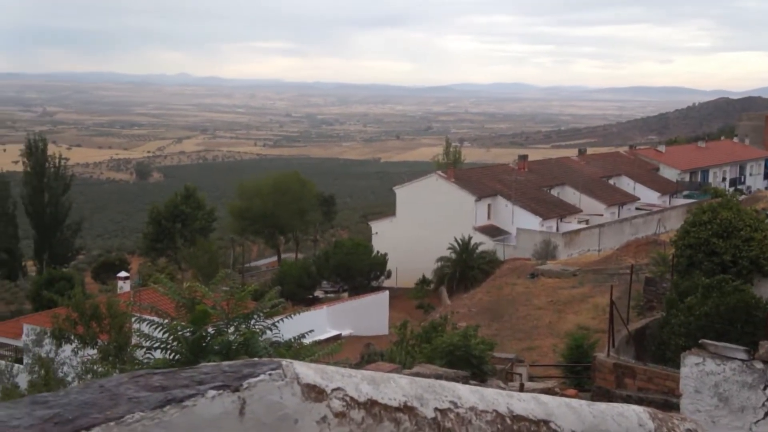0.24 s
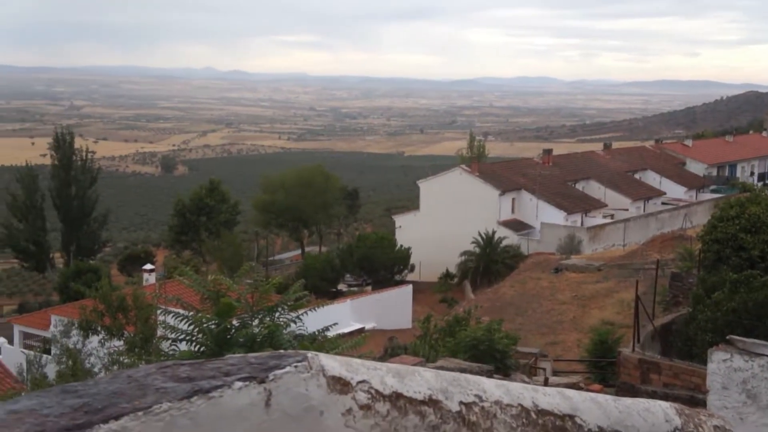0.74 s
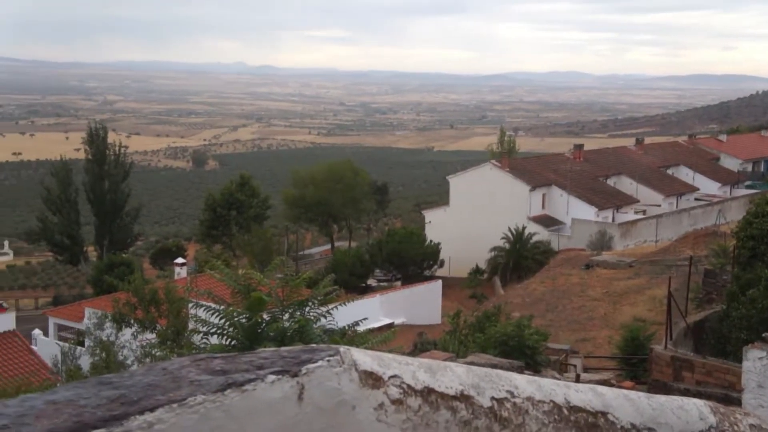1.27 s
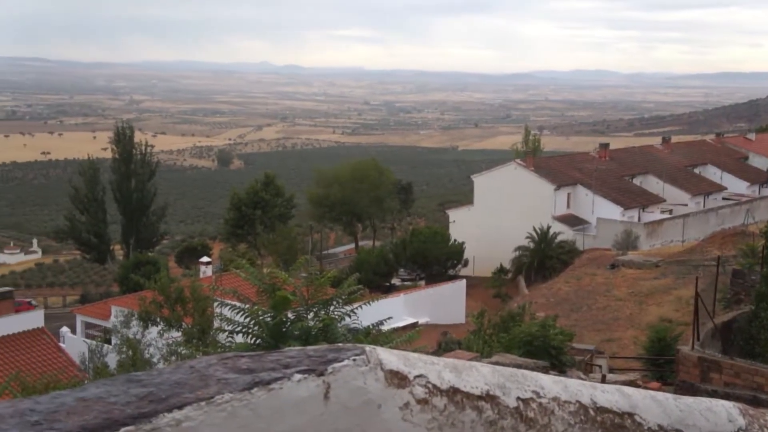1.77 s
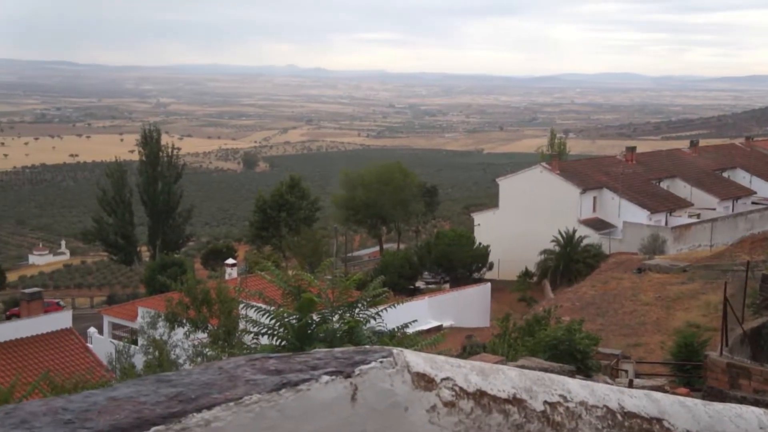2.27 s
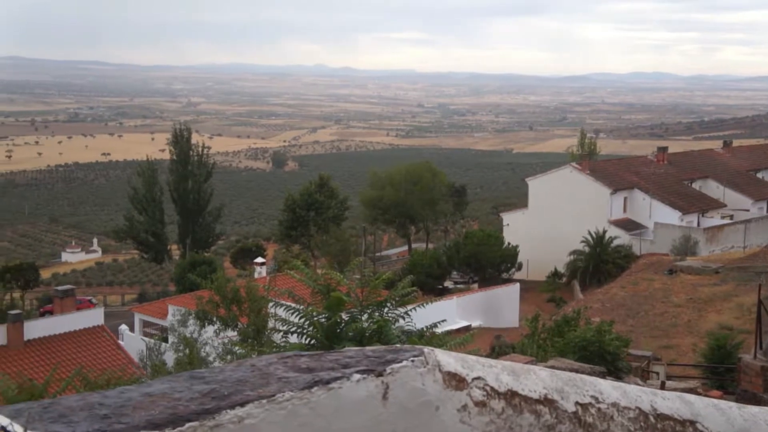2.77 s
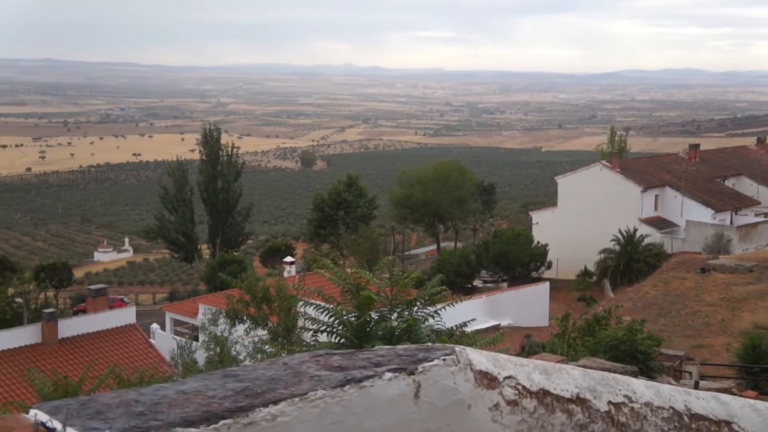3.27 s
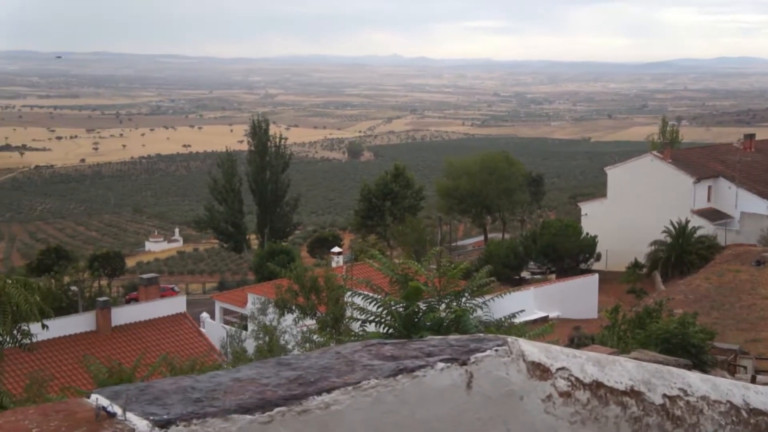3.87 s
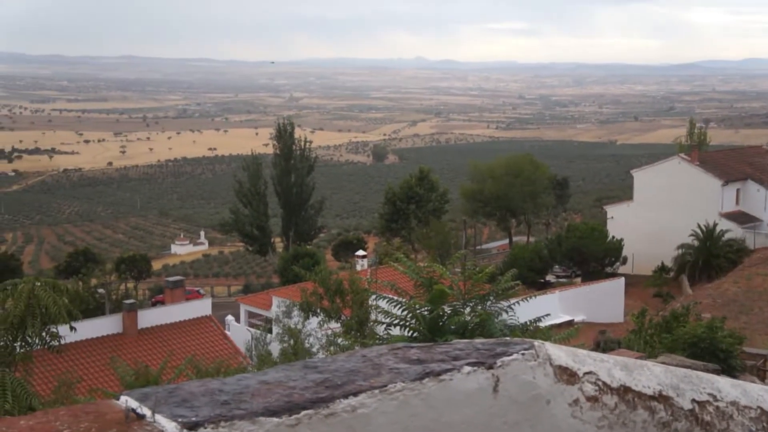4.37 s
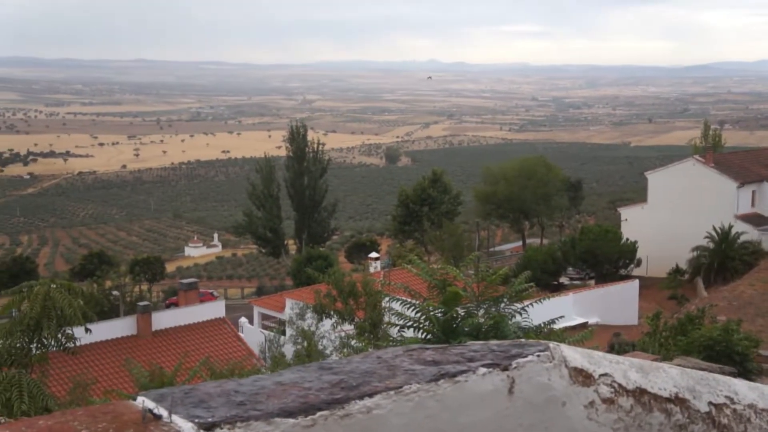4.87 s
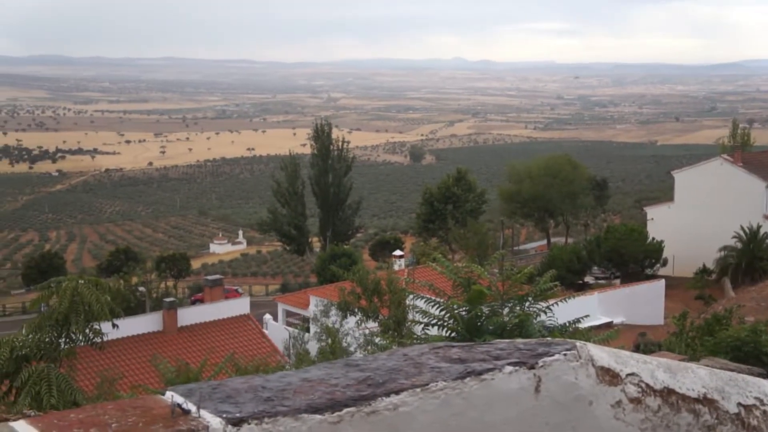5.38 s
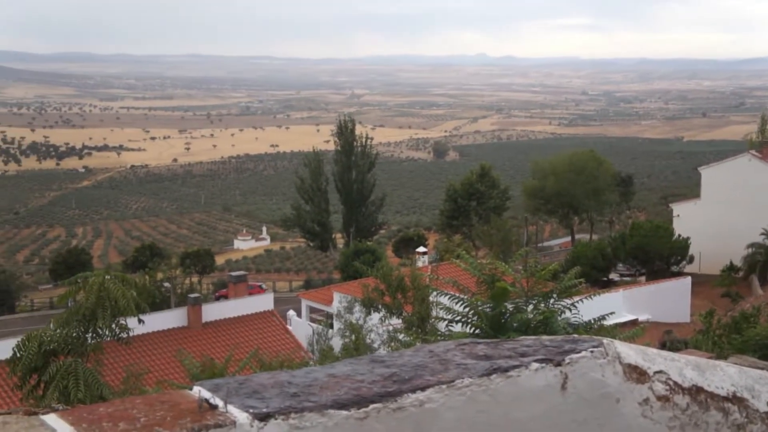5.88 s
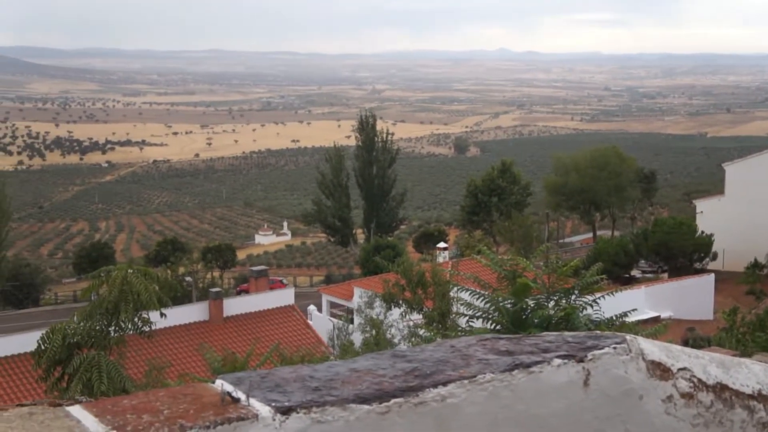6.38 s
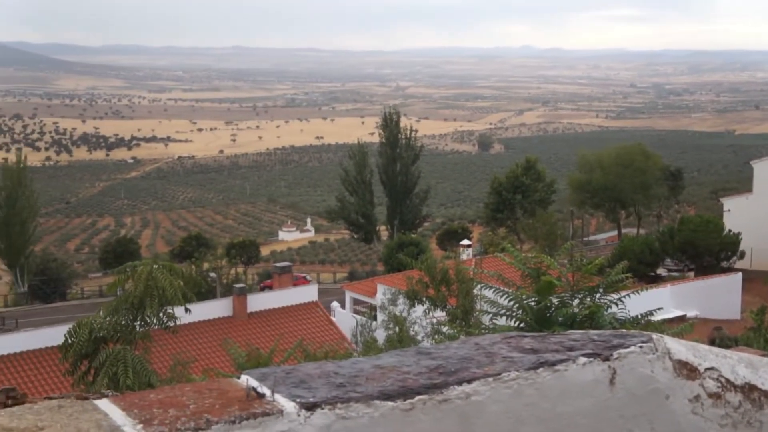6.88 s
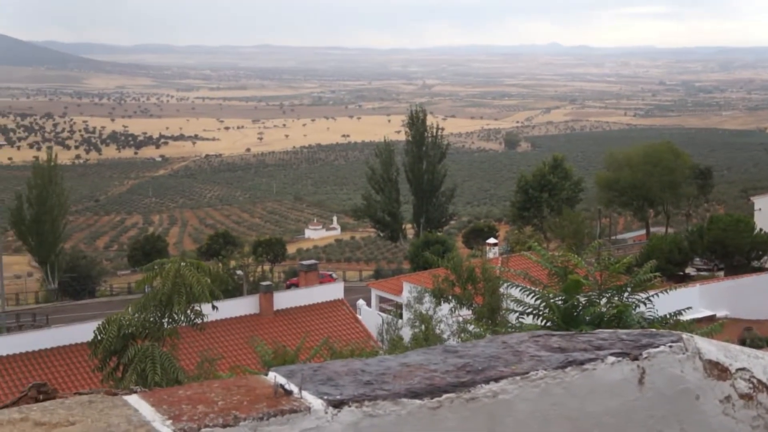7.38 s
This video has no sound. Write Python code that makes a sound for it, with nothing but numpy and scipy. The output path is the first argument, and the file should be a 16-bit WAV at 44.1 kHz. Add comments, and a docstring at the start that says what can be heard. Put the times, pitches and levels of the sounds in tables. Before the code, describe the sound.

Light rain falls steadily outdoors near houses, a soft wash with a fine patter on leaves. Single drops land close to the microphone as sharp, irregular ticks, the loudest near the end. Small birds give a few short, scratchy whistles that echo lightly between walls, clearest around the middle. A very faint low hum wavers underneath, all heard in stereo.

```python
"""Light rain on vine leaves by a house: a soft wash, a patter and a few sharp ticks close by.
Countless far drops blur into the wash; each nearer drop hits a leaf and makes it ring briefly.
Small birds fly past with short scratchy whistles that ring between the walls.
A faint hum wavers low down. A small microphone with two openings hears it all in stereo."""
import sys
import numpy as np
from scipy import signal
from scipy.fft import rfft, irfft
from scipy.io import wavfile
from scipy.ndimage import uniform_filter1d

SR = 44100
rng = np.random.default_rng(int(sys.argv[2]) if len(sys.argv) > 2 else 0)


def file_out(sig):
    """Save sig as 16-bit WAV at sys.argv[1]."""
    # one column per channel
    cols = np.atleast_2d(sig).T
    # limit, then scale
    lim = np.clip(cols, -1, 1)
    pcm = np.round(lim * 32767).astype(np.int16)
    wavfile.write(sys.argv[1], SR, pcm)


N = 336483


def rain():
    """Steady light rain: far drops make a wash, nearer ones patter on the leaves."""
    # strength of the rain over time: time_s, level_db
    strength = [(0.0, -45), (2.7, -44), (3.04, -45.5), (3.61, -44.5), (3.7, -45.5), (6.33, -44),
                (7.63, -44.5)]
    time_s, level_db = np.transpose(strength)
    level = gain_of(np.interp(np.arange(N) / SR, time_s, level_db))
    return level * (gain_of(3.5) * rain_wash() + gain_of(-4.5) * leaf_patter())


def rain_wash():
    """Countless far drops blur into a hiss with drifting patches and flicker."""
    # tone colour of the wash: pitch_hz, level_db
    colour = [(18, -51), (30, -22), (332, -7.5), (410, -5.5), (533, -5), (609, -5.5), (752, -6.5),
              (1210, -2.5), (3210, -10), (8760, -30.5), (10500, -31), (11700, -44.5), (13000, -42),
              (14900, -43), (16500, -65)]
    # how unevenly the wash falls: pitch_hz, swing_db
    unevenness = [(100, 1), (500, 2), (2000, 2.5), (4000, 1.5), (9000, 1.9)]
    frames, hz = N // 128 + 5, np.fft.rfftfreq(512, 1 / SR)
    left_real, left_imag, right_real, right_imag, drift = rng.standard_normal((frames, 257, 5)).T
    flicker = evened(uniform_filter1d(uniform_filter1d(drift[::-1], 60, 0), 2, 1))  # broad and quick
    patches = evened(uniform_filter1d(uniform_filter1d(drift, 6, 0), 20, 1))  # narrow and slower
    spectra = np.array([left_real + 1j * left_imag, right_real + 1j * right_imag])
    spectra *= gain_of(read(unevenness, hz)[:, None] * (patches + 0.8 * flicker))
    noise = signal.istft(spectra, nperseg=512, noverlap=384)[1][:, :N]
    return evened(equalize(noise, colour))


def leaf_patter(leaves=24, drops_per_s=400):
    """Each drop rings one leaf for a few cycles; a few drops are large."""
    # how loudly the leaves ring: pitch_hz, level_db
    leaf_levels = [(300, -11.5), (600, -4.5), (1200, 0), (2000, 6.5), (3100, 9), (5000, -23), (9000, -28)]
    size = gain_of(3.8 * np.minimum(rng.exponential(1, (2, N)), 3.5))
    hits = size * (rng.random((2, N)) < drops_per_s / SR)
    leaf_hit = rng.integers(0, leaves, (2, N))
    t, out = np.arange(1200) / SR, np.zeros((2, N))
    for leaf, hz in enumerate(np.geomspace(300, 9000, num=leaves)):
        ring = np.sin(2 * np.pi * hz * t) * t * np.exp(-t * hz / 0.99) * hz ** 1.01
        ringing = signal.oaconvolve(hits * (leaf_hit == leaf), ring[None])[:, :N]
        out += gain_of(read(leaf_levels, hz)) * ringing
    return evened(out)


def close_drops():
    """Single drops land close by: the loudest at set times, fainter ones at random."""
    # loudest drops: start_s, tick_db, tick_hz, leaf_db, leaf_hz, push_db, splash_db, pan_db
    # (leaf, push and splash levels count from the tick's level)
    loud_drops = [(0.06, -40, 1930, -10, 1050, -22, 5, 7), (0.27, -32.5, 2760, -4, 1520, -23, -24, -5),
                  (0.379, -45, 2210, 18, 1380, -5, -19, -4), (0.7664, -41, 2000, 8, 1020, -5, -20, 2),
                  (0.7869, -49, 2270, 20, 1200, -7, -5, 0.0), (0.822, -39, 1950, 7, 1040, -43, 10, 15.5),
                  (0.8405, -35, 1900, -8, 1060, -24, -20, -5), (1.1109, -38.5, 2760, -20, 1170, 7, -8, 0),
                  (1.283, -32.5, 2120, -15, 1020, -17, -14, -3),
                  (1.3358, -25.5, 2800, -32, 1500, -29, -2, 6.5), (1.6528, -40.5, 2740, 12, 1290, 1, -3, 0),
                  (2.2075, -26, 2700, -4, 1290, -15, -33, -3.5), (2.216, -44, 2880, 6, 1420, -10, -21, 3),
                  (2.3196, -25, 2930, -10, 1240, 3.5, -3, 17), (2.4453, -31.5, 2210, -10, 1230, 1, -5, -3),
                  (2.8016, -43.5, 1930, 8, 1010, -14, -18, 7), (3.1823, -38, 2910, 3, 1240, 2, -10, -2),
                  (3.4398, -50.5, 2900, 18, 1080, -9, -18, -5), (3.4969, -38, 2830, 5, 1230, -19, -24, -3),
                  (3.5623, -33.5, 1980, -0.5, 1060, -8, -17, -3), (4.37, -36.5, 2150, -1, 872, -17, -23, 3),
                  (4.412, -32.5, 2640, -3, 1310, -18, -26, -5), (4.5668, -31, 2800, -13, 1180, -20, -7, 9),
                  (4.784, -53, 2160, 14, 970, -10, -19, -1.0), (5.16, -42.5, 1960, 9.5, 1150, 0, -15, 3),
                  (5.5366, -34.5, 2230, -2, 775, -17, 2, 5), (5.7718, -45, 2180, 11, 1070, -15, -18, -1.5),
                  (5.826, -38, 2130, -2, 1010, 4, -19, 3), (5.925, -48, 2050, 5, 1000, 16, -12, 0),
                  (5.9623, -34, 3100, -17, 778, -25, -5, 0), (6.1644, -39, 3100, 0.5, 1110, -1, 1, 0),
                  (6.2933, -25.5, 2900, -34, 1000, -27, -33, -2),
                  (6.345, -37, 2280, -18, 1490, -16, -23, -9), (6.5355, -27, 2020, -0.5, 1240, -8, -27, -3),
                  (6.8079, -30.5, 3060, -5.5, 999, -3, -5, -1),
                  (7.0502, -14, 3200, -5.5, 1690, -15, -37, 9),
                  (7.1732, -49, 1930, 12.5, 1020, -11, -22, 10),
                  (7.223, -26, 2380, -11, 1200, -38, -16, -3), (7.231, -34.5, 2040, -15, 1250, -32, -24, 5),
                  (7.3105, -31, 3050, -2.5, 1380, -43, -15, 0), (7.3224, -43, 2240, 8, 1300, -15, 13, -1),
                  (7.432, -52, 3080, 24, 1540, -6, -1, -3)]
    # a typical faint drop, one row for each column above after start_s: middle, spread (same units)
    typical_drop = [(-46, 2.5), (2400, 400), (2, 5), (1150, 180), (-5, 5), (-15, 4), (0.0, 4)]
    middle, spread = np.transpose(typical_drop)
    draws = rng.random((24, 1 + len(middle)))  # 24 faint drops
    faint_drops = np.c_[draws[:, 0] * N / SR, middle + spread * np.sqrt(12) * (draws[:, 1:] - .5)]
    out = np.zeros((2, N))
    for start_s, *settings in loud_drops + faint_drops.tolist():
        add(out, start_s, drop(*settings))
    return out


def drop(tick_db, tick_hz, leaf_db, leaf_hz, push_db, splash_db, pan_db):
    """One impact makes a tick, the leaf's ring and tremble, a low push and a bright splash."""
    hard = tick_db + abs(pan_db) / 2 > -19  # the loudest hit something stiff: short, broad and bright
    tremble_s, spray_s = (.008, .0006) if hard else (.042, .001)
    tick_width_hz, splash_hz = (2400, 7900) if hard else (1600, 5400)
    t = np.arange(2200) / SR
    noise = rng.standard_normal(len(t)) * (1 - np.exp(-t / 0.0001))
    impact = 1.83 * np.exp(-(t / .00004 - 3) ** 2)
    burst = impact + noise * np.exp(-t / spray_s)
    tremble = noise * gain_of(-60 * t / tremble_s)
    tick = band(burst, tick_hz, tick_width_hz) + gain_of(-1.5) * band(tremble, tick_hz, 910)
    leaf = gain_of(leaf_db) * band(burst + gain_of(6) * tremble, leaf_hz, 600)
    push = gain_of(push_db) * band(np.gradient(burst), 315, 470)
    splash = gain_of(splash_db) * band(burst, splash_hz, 2100)
    return pan(gain_of(tick_db) * (tick + leaf + push + splash), pan_db)


def bird_calls():
    """Small birds whistle in short clusters of notes."""
    # notes: start_s, rise_s, hold_s, fall_s, level_db, start_hz, risen_hz, held_hz,
    # wobble_hz, high_tones_db, rasp_db, pan_db
    notes = [(0.945, 0.026, .016, 0.015, -12.5, 4450, 4960, 5240, 207, -21, -14.5, -2),
             (0.952, 0.004, .03, .014, -36, 2370, 2373, 2595, 179, -30, -8, -3),
             (0.978, 0.013, 0.064, 0.034, -21.5, 6300, 6370, 6694, 110, -20, -50, 2),
             (1.345, 0.0074, .003, 0.019, -32.5, 2370, 2426, 2480, 58, -3, -11, -7),
             (1.347, 0.0053, 0.0069, 0.0093, -30, 4500, 4890, 6050, 910, -25, -10, 0),
             (3.632, 0.011, 0.041, 0.012, -25, 4270, 4620, 4900, 180, -17.5, -12, -2),
             (3.637, 0.022, 0.011, 0.0062, -16, 2243, 3290, 3224, 49.3, -8.5, -16, -3.5),
             (3.692, 0.011, .006, .008, -23, 3210, 3240, 3320, 49, -10, -10, -3),
             (3.7, 0.01, 0.021, .014, -8.5, 4100, 4130, 4330, 88, -31, -15, -5),
             (3.733, 0.014, .02, 0.0055, -18.5, 2864, 3217, 3680, 342, -9.5, -9.5, -1),
             (3.77, 0.0076, 0.0029, .01, -3, 4360, 4190, 4080, 69, -37, -17, -3),
             (3.781, 0.00675, 0.0258, 0.025, -14.5, 4100, 4050, 4306, 69.4, -23, -23, -5.5),
             (4.913, 0.04, 0.0543, 0.023, -19, 6750, 7060, 6650, 152, -16, -54, -0.5),
             (4.924, 0.0059, .003, 0.047, -29, 5650, 5850, 5740, 400, -21, -14, -3),
             (5.287, 0.015, 0.016, 0.0098, -20, 5550, 5610, 5530, 188, -39, -20, -1.5),
             (5.297, 0.013, 0.035, 0.02, -24, 6640, 6910, 7040, 203, -15, -44, 1),
             (7.338, 0.027, 0.049, 0.01, -17.5, 6050, 6450, 6650, 102, -20.5, -49, -1.5),
             (7.432, 0.0088, 0.0085, 0.038, -14, 6400, 6500, 6320, 98, -19.5, -52, -1)]
    out = np.zeros((2, N))
    for start_s, *settings in notes:
        add(out, start_s, whistle(*settings))
    return out


def whistle(rise_s, hold_s, fall_s, level_db, start_hz, risen_hz, held_hz,
            wobble_hz, high_tones_db, rasp_db, pan_db):
    """A raspy note swells, holds and fades as its pitch slides and wobbles; fainter tones lie above."""
    corners_s = np.cumsum([0, rise_s, hold_s, fall_s])
    t = np.arange(0, corners_s[-1], 1 / SR)
    shake, hiss = rng.standard_normal((8000, 2))[:len(t)].T
    pitch = np.interp(t, corners_s[:3], [start_hz, risen_hz, held_hz])
    wobble = wobble_hz * evened(uniform_filter1d(uniform_filter1d(shake, 50), 50))
    phase = 2 * np.pi * np.cumsum(pitch + wobble) / SR
    octave = np.sin(2 * phase) * (pitch < SR / 7.3)
    mirror_hz, limit_hz = 20000, 15400  # a faint high artificial tone falls as the whistle rises
    mirrored = 0.23 * np.sin(2 * np.pi * mirror_hz * t - phase) * (mirror_hz - pitch < limit_hz)
    extra_tone = gain_of(-17) * np.sin(1.58 * phase)
    tone = np.sin(phase) + gain_of(high_tones_db) * (octave + mirrored + extra_tone)
    rasp = evened(resonate(resonate(hiss, 1.15 * pitch, 2600), 1.15 * pitch, 2200))
    level = gain_of(level_db + np.interp(t, corners_s, [-21.5, 0, 0, -36]))
    level *= signal.windows.tukey(len(t), .15)  # soft ends
    return pan(level * (np.sqrt(2) * tone + gain_of(rasp_db) * rasp), pan_db)


def wall_echoes(sound):
    """Sound bounces back: a quick tail from near walls, a faint long one from far houses."""
    # time the near walls' echo takes to fade by 60 dB: pitch_hz, fade_s
    near_walls = [(500, 0.064), (3200, 0.16), (4200, 0.21), (5000, 0.14), (6500, 0.2), (12000, 0.21)]
    # the same for the far houses: pitch_hz, fade_s
    far_houses = [(500, 2.3), (3300, 1.2), (4200, 1.4), (5000, 0.73), (6600, 0.75), (12000, .5)]
    echoes = np.zeros((2, SR))
    arrivals = np.arange(200, SR - 20, 20) + rng.integers(0, 20, (2, (SR - 201) // 20))
    np.put_along_axis(echoes, arrivals, rng.choice([-1., 1.], arrivals.shape), 1)
    hz, t, spectra = signal.stft(echoes, SR, nperseg=256)
    near_fade = gain_of(-60 * t / read(near_walls, hz)[:, None])
    far_fade = gain_of(-28 - 60 * t / read(far_houses, hz)[:, None])
    tail = signal.istft(spectra * (near_fade + far_fade), SR, nperseg=256)[1]
    return signal.fftconvolve(sound, tail / np.linalg.norm(tail[0]), axes=1)[:, :N]


def hum():
    """Faint low tones, mostly wavering and partly steady."""
    # tones of the hum: pitch_hz, width_hz, level_db, steady_share (0 to 1)
    tones = [(420, 25, -58, .1), (590, 30, -61, .0), (618, 20, -56, .3)]
    t, out = np.arange(N) / SR, 0
    for hz, width, db, steady in tones:
        noise = rng.standard_normal((2, N))
        wavering = evened(np.array([resonate(resonate(x, hz, width), hz, width) for x in noise]))
        tone = np.sqrt(2 * steady) * np.sin(2 * np.pi * hz * t)
        out = out + gain_of(db) * (tone + np.sqrt(1 - steady) * wavering)
    return out


def blend(main, other, likeness):
    """One microphone opening hears a share of the main sound, shifted in phase, plus some of the other."""
    # phase shift between the openings: pitch_hz, lag_radians
    lags = [(100, 1), (600, -0.53), (1120, -1.41), (1890, -2.5), (3100, -2), (4050, -2.5), (5500, -2.5),
            (8000, -2)]
    shift = np.exp(-1j * read(lags, np.fft.rfftfreq(N, 1 / SR)))
    return irfft(likeness * rfft(main) * shift + np.sqrt(1 - likeness ** 2) * rfft(other), N)


def gain_of(db):
    """Turns decibels into a factor."""
    return 10 ** (np.asarray(db) / 20)


def evened(x):
    """Scales a signal to an average power of 1."""
    return x / np.sqrt(np.mean(x ** 2) + 1e-20)


def read(points, hz):
    """Looks up a table's value at a pitch, gliding between its rows."""
    pitches, values = np.transpose(points)
    return np.interp(np.log(hz + 1), np.log(pitches + 1), values)


def equalize(x, points, amount=1):
    """Turns each pitch up or down by a table's decibels times the amount."""
    return irfft(rfft(x) * gain_of(amount * read(points, np.fft.rfftfreq(N, 1 / SR))), N)


def pan(sound, pan_db):
    """Makes a stereo pair with the left side louder by pan_db."""
    return sound * gain_of([[pan_db / 2], [-pan_db / 2]])


def add(mix, start_s, sound):
    """Mixes a sound in at its start time."""
    part = mix[..., max(round(start_s * SR), 0):][..., :sound.shape[-1]]
    part += sound[..., :part.shape[-1]]


def resonate(x, hz, width_hz):
    """Rings around one pitch: shifts that pitch down to zero, smooths, and shifts back."""
    turn = np.exp(2j * np.pi * np.cumsum(hz * np.ones(len(x))) / SR)
    decay = np.exp(-np.pi * width_hz / SR)
    return 2 * (turn * signal.lfilter([1 - decay], [1, -decay], x / turn + 1e-18)).real


def band(x, hz, width_hz):
    """Keeps the sound around one pitch and scales its peak to 1."""
    ring = resonate(resonate(x, hz, width_hz), hz, width_hz)
    return ring / abs(ring).max()


def scene():
    """Rain, close drops, birds and hum as the two microphone openings hear them."""
    # how alike rain and hum are on the two sides: pitch_hz, likeness (0 to 1)
    likeness = [(60, 0.25), (300, 0.24), (600, 0.1), (1000, 0.44), (3000, 0.95), (8000, 0.11),
                (15000, 0.13)]
    # how much louder they are on the left: pitch_hz, pan_db
    lean = [(60, -3.5), (180, 4), (550, 6), (1650, -1.5), (4970, 0.0), (15000, 2)]
    bed = rain() + hum()
    bed[1] = blend(bed[0], bed[1], read(likeness, np.fft.rfftfreq(N, 1 / SR)))
    bed = equalize(bed, lean, amount=np.array([[.5], [-.5]]))
    drops, birds = close_drops(), bird_calls()
    drops[1] = blend(drops[1], drops[0], likeness=0.97)
    birds[1] = blend(birds[1], birds[0], likeness=0.88)
    drops = gain_of(3) * (drops + gain_of(-38) * wall_echoes(drops))
    return bed + drops + gain_of(-2) * birds + gain_of(-3) * wall_echoes(birds)


def record(dry):
    """Filters cut the bass, a band near 12 kHz and the highest treble; loud calls turn the level down."""
    # a gap in the treble near 12 kHz, with a lift above it: pitch_hz, gain_db
    treble_gap = [(10600, -0.5), (11300, -9.5), (12500, -45), (13100, 4.5)]
    bass_hz, top_hz, loud_db, average_s = 60, 16200, -22.5, .12
    thin = signal.sosfilt(signal.butter(2, bass_hz, "high", fs=SR, output="sos"), dry)
    decay = np.exp(-1 / (average_s * SR))
    power_db = 10 * np.log10(signal.lfilter([1 - decay], [1, -decay], (thin ** 2).mean(0)) + 1e-12)
    turned_down = thin / gain_of(0.54 * np.maximum(power_db - loud_db, 0))
    top_cut = signal.firwin(511, top_hz, window=("kaiser", 9), fs=SR)
    return signal.oaconvolve(equalize(turned_down, treble_gap), top_cut[None], "same")


dry = scene()
out = record(dry)
file_out(out)
```